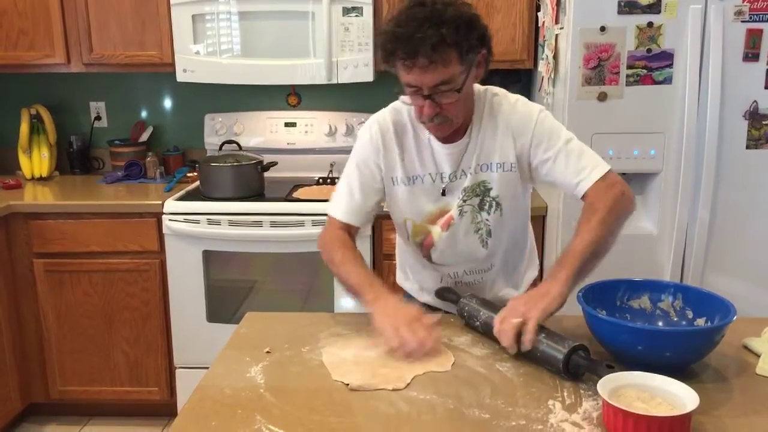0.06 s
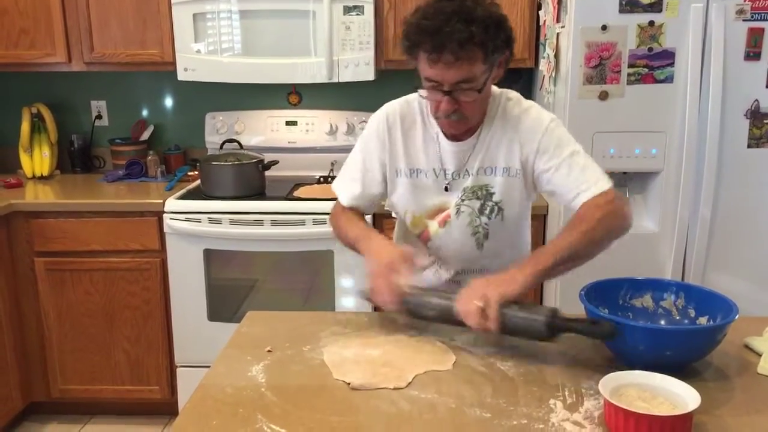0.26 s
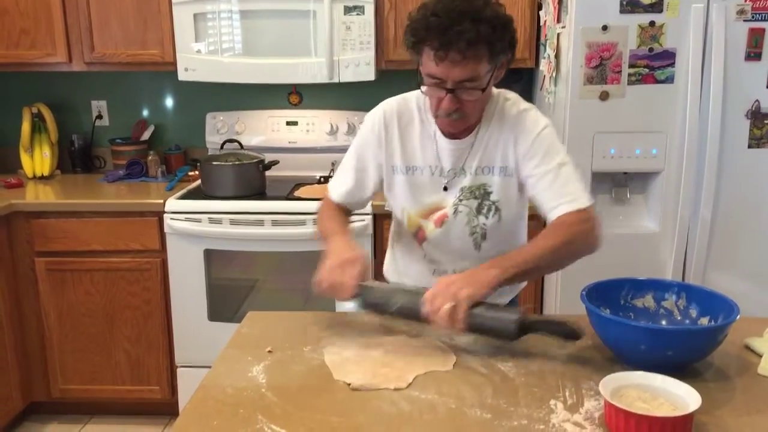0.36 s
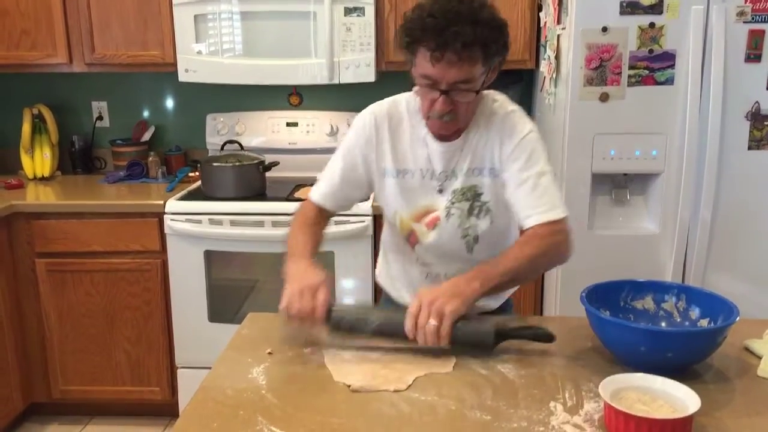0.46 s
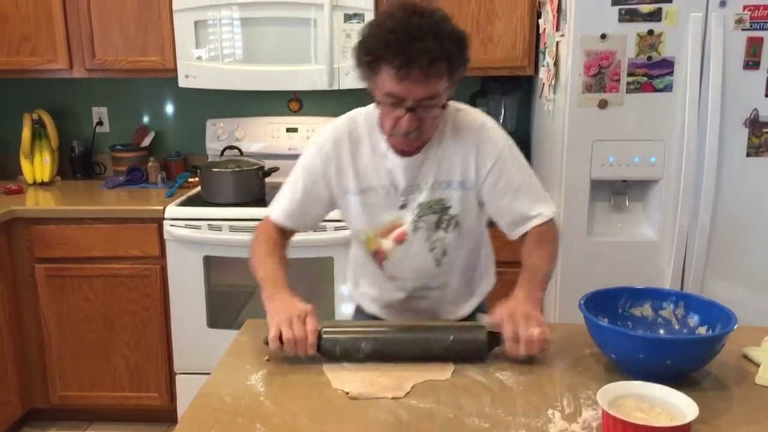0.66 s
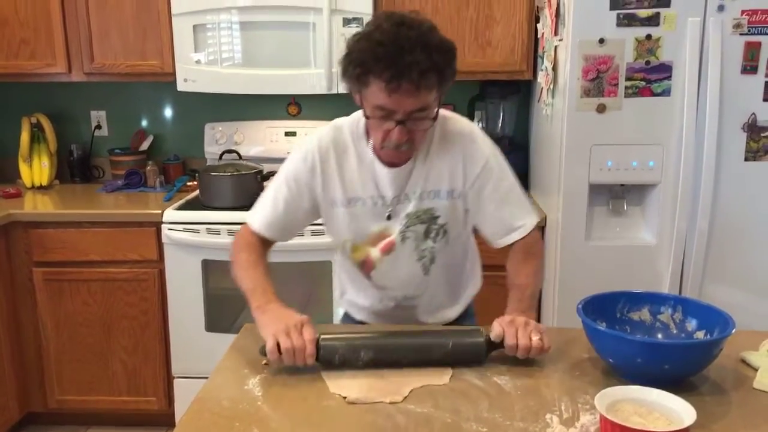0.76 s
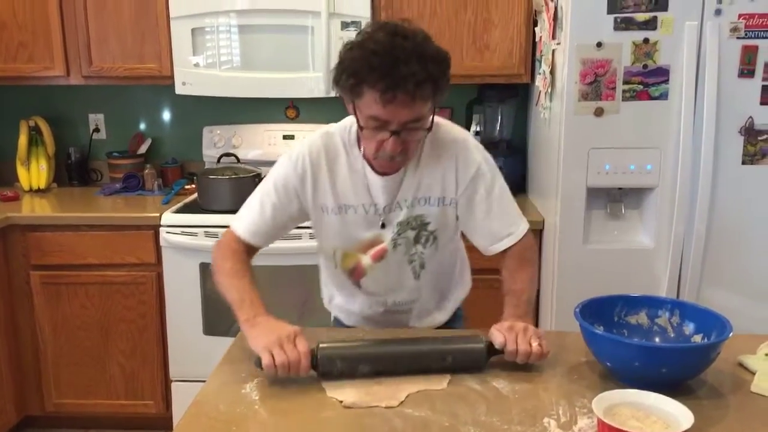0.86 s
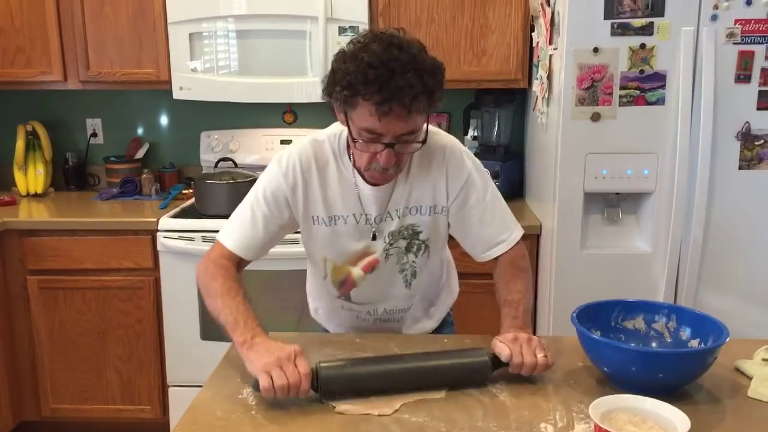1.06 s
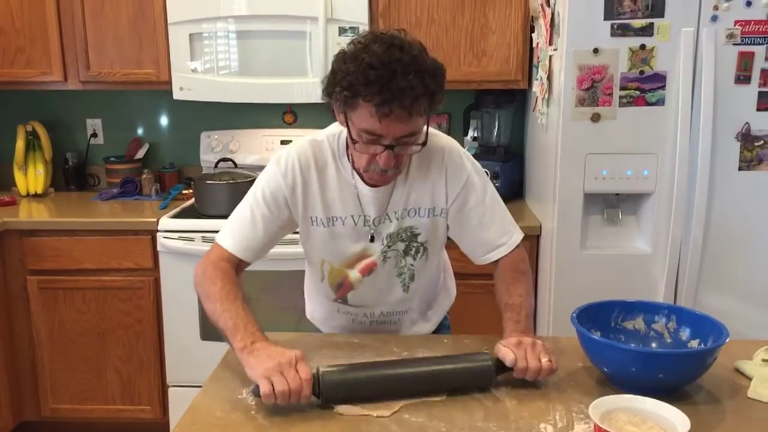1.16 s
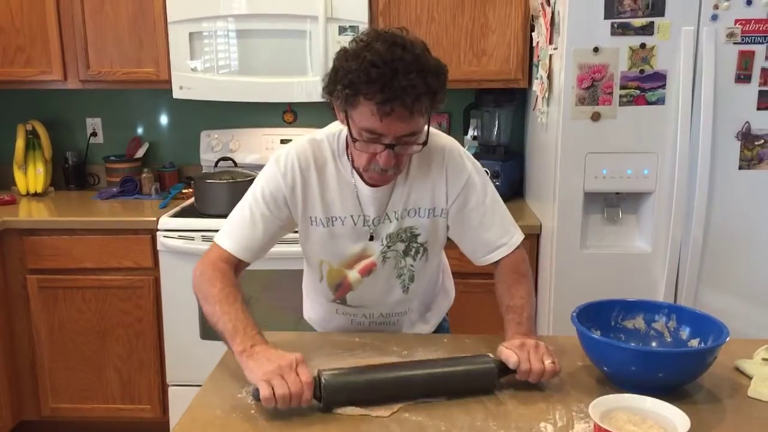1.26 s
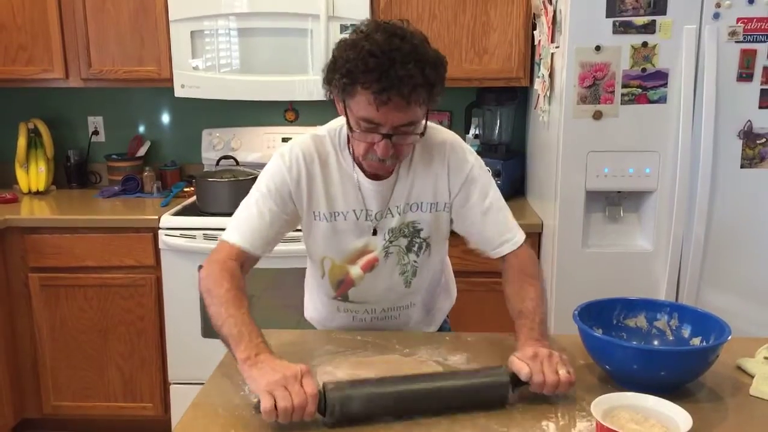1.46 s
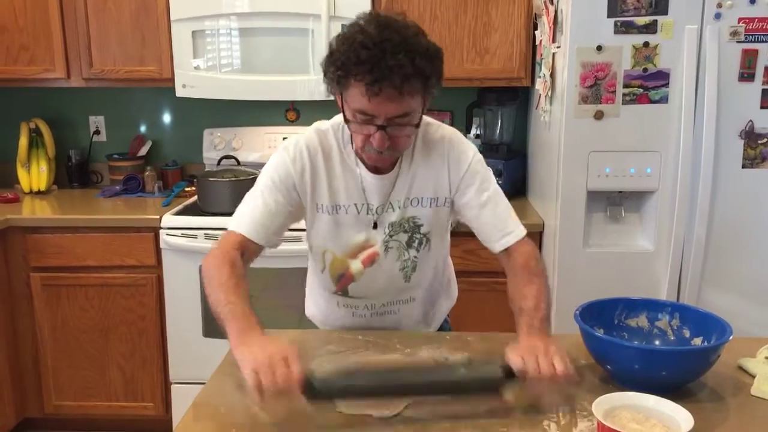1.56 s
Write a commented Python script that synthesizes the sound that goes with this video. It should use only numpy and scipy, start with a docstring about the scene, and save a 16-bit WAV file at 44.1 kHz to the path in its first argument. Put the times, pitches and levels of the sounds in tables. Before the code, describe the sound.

Rolling pin on dough: soft scrape and clack, a bright hard clack with hollow ringing, a dull landing thud with brief rumble and floury hiss, one tick, then very quiet rolling, heard fairly close in a lively kitchen.

```python
"""Rolling pin on dough

A heavy rolling pin is picked up in a kitchen: clacks of noise and beating damped sines are its barrel
hitting the handles and ringing. Damped knocks with low noise are handle knocks in the air, then thuds onto
dough on the countertop. Rolling is a low noise rumble, a grainy hiss of flour with crumb impulses, resonant
axle rub with faint sine squeaks, a lingering countertop tone near 600 Hz and a few handle ticks.
A refrigerator hums as a wavering sine in the small, live room."""
import sys
import numpy as np
from scipy import signal
from scipy.fft import rfft, irfft, next_fast_len
from scipy.io import wavfile

SR = 44100
rng = np.random.default_rng(int(sys.argv[2]) if len(sys.argv) > 2 else 0)


def bounce(signal):
    """Save signal as a 16-bit WAV file at the path given by the first command-line argument."""
    frames = np.transpose(np.atleast_2d(signal))
    limited = np.clip(frames, -1, 1)
    pcm = np.round(limited * 32767).astype(np.int16)
    wavfile.write(sys.argv[1], SR, pcm)


N = 70560

# Spectrum of still air. Each row: frequency in Hz, level in dB.
AIR_COLOUR = [(20, -5), (60, 5.5), (150, -8), (300, -8), (700, -9), (1500, -14.5), (3000, -13.5),
              (8000, -21), (15000, -24)]
HUM_HZ, HUM_DB, AIR_DB = 119.3, -69.5, -72.5  # refrigerator hum

# Rumble of weight moving on the dough. Each row: time in seconds, level in dB.
RUMBLE_LEVEL = [(0, -64), (.06, -72), (.13, -87), (.2, -70), (.49, -97), (.53, -42), (.6, -50),
                (.65, -55.5), (.75, -65), (.9, -78), (1.33, -90.5), (1.39, -62.5), (1.435, -57),
                (1.49, -59.5), (1.54, -91), (1.6, -73)]
# Rumble spectrum. Each row: frequency in Hz, level in dB.
RUMBLE_COLOUR = [(30, -9), (130, -8.5), (190, -1), (245, -7.5), (340, -10.5), (520, 3), (750, -6.5),
                 (1150, -3), (2000, -30.5), (5000, -35), (15000, -57)]
# Countertop resonances. Each row: centre in Hz, width in Hz, level in dB.
COUNTERTOP_PEAKS = [(246, 16, -1.5), (510, 20, -2.5), (530, 28, -4.5)]
COUNTERTOP_DB = 1.5  # against the rumble noise
# Deep shake of the cabinet. Each row: time in seconds, level in dB.
SHAKE_LEVEL = [(.06, -71.5), (.12, -63), (.18, -76.5), (.5, -76.5), (.53, -52), (.58, -55), (.64, -61),
               (.72, -77.5)]
# Cabinet bass spectrum. Each row: frequency in Hz, level in dB.
BASS_COLOUR = [(20, -17.5), (45, 4.5), (80, -3.5), (130, 5), (200, -1.5), (400, -29)]

# Hiss of floury surfaces sliding. Each row: time in seconds, level in dB.
FLOUR_LEVEL = [(0, -57), (.045, -47.5), (.11, -63.5), (.38, -68.5), (.47, -52), (.55, -63), (.645, -48.5),
               (.67, -80), (.9, -80), (1.35, -84), (1.39, -73.5), (1.46, -78), (1.5, -66.5), (1.54, -99)]
# Flour spectrum. Each row: frequency in Hz, level in dB.
FLOUR_COLOUR = [(500, -18), (2000, 7), (4500, -5), (6000, 0), (8500, -5.5), (13000, -7), (15500, -12.5)]
# Crushed-crumb spectrum. Each row: frequency in Hz, level in dB.
CRUMB_COLOUR = [(600, -19), (2000, -3), (4000, 7.5), (7000, -8), (15000, -10.5)]
GRAIN_DB, GRAIN_KNOTS_PER_S = 1.2, 900
CRUMBS_PER_S, CRUMB_DB, CRUMB_SPREAD_DB = 130, -8, 14  # mean rate, level against the hiss, size scatter

# Rub of the axle. Each row: time in seconds, level in dB.
AXLE_LEVEL = [(0, -73), (.05, -40), (.11, -60.5), (.2, -58.5), (.7, -54.5), (.81, -61.5), (.93, -66.5),
              (1.03, -64), (1.12, -73.5), (1.24, -84.5), (1.33, -78), (1.42, -85)]
# Axle resonances. Each row: centre in Hz, width in Hz, level in dB.
AXLE_PEAKS = [(620, 15, -7.5), (900, 260, -5), (1396, 89, 5), (1765, 140, 0.5), (2290, 120, -7),
              (2630, 280, -10)]
# Squeaks of the axle and a low lingering tone of the countertop near 600 Hz. Each row: start in
# seconds, length in seconds, pitch in Hz, glide in Hz per second, level in dB.
SQUEAKS_AND_TONE = [(.51, 0.09, 7070, 0, -58), (0.533, 0.074, 9600, 0, -59),
                    (0.513, 0.098, 12700, -2.5, -55), (0.767, 0.034, 9740, 0, -67),
                    (0.778, 0.059, 1420, -4, -61), (0.822, 0.16, 599.5, -17, -62),
                    (0.925, 0.23, 1744, -300, -63.5), (1.304, .055, 1422, -1800, -70)]
AXLE_CATCH_DB, AXLE_CATCH_KNOTS_PER_S = 3, 90
ROUGH_RAD, ROUGH_KNOTS_PER_S = 0.87, 130  # phase wander at 1 kHz, growing as the root of pitch

# Hard contacts of barrel and axle. Each row: start in seconds, level in dB, barrel ring in dB
# against that level, rod ring in dB against that level, rattle T60 in seconds.
CLACKS = [(.0075, -32, -16.5, 0, 0.036), (0.2187, -18, -3, -30, 0.062), (0.2277, -26.5, -17.5, -17, 0.028),
          (1.3841, -55.5, -18, -10, .012), (1.416, -60.5, -21, -17, 0.016),
          (1.4484, -50.5, -26.5, -11.5, 0.021)]
# Clack spectrum. Each row: frequency in Hz, level in dB.
CLACK_COLOUR = [(70, -52.5), (250, -3), (620, -2), (1000, 0.5), (1700, -3), (2900, -4), (3700, 1),
                (5500, -3.5), (7000, -8.5), (10000, -14), (15000, -20.5)]
# Barrel modes. Each row: frequency in Hz, level in dB, T60 in seconds.
BARREL_MODES = [(633, -16, 0.39), (677.2, -11.5, 0.49), (706.7, -12.5, .2), (914, -15, 0.31),
                (1026, -16.5, 0.25), (1317, -17, 0.39), (1905, -16, 0.7), (2527, -11, 0.55),
                (3620, -9, 0.26), (3780, -10.5, .13), (4664, -17, 0.18), (5570, -15.5, 0.3),
                (5784, -22, 0.38), (8880, -22.5, 0.22)]
# Thinner modes of the axle rod. Each row: frequency in Hz, level in dB, T60 in seconds.
ROD_MODES = [(1070, -16, 0.18), (1549, -14, 0.92), (3025, -6, 0.11), (3914, -12.5, .25)]
CLACK_RISE_S, CLACK_HOLD_SHARE = 0.0022, 0.12  # hold as a share of T60
BEAT_HZ, BEAT_DEPTH = 4.3, 0.85  # mean split, partner amplitude ratio
RING_WANDER_RAD, RING_FLUTTER_DB, RING_KNOTS_PER_S = 0.3, 1.5, 55

# Dull blows: handle knocks in the air, then chattering on landing and bumping while rolling.
# Each row: start in seconds, level in dB, bass in dB against that level before BASS_DB is added.
THUDS = [(.2458, -17, -29), (.2695, -26.5, -9), (0.4873, -17.5, 0.5), (0.494, -21.5, -8.5),
         (.5025, -22, -12), (.511, -24, -16), (.602, -35, -16), (1.402, -64, -18), (1.4205, -61.5, -19),
         (1.434, -63, -20)]
# Modes excited by the blows. Each row: frequency in Hz, level in dB, T60 in seconds.
THUD_MODES = [(249.4, -18, 0.14), (407, -22, 0.08), (474, -19.5, 0.11), (528, -13.5, 0.24),
              (609, -16.5, 0.1), (715, 4, 0.017), (738, -12.5, 0.09), (845, -14.5, 0.067),
              (880, -11, 0.013)]
# Blow noise spectrum. Each row: frequency in Hz, level in dB.
THUD_COLOUR = [(60, -22.5), (300, -10.5), (550, 6), (850, -3), (1200, -7), (2500, -12.5), (5000, -25),
               (9000, -42), (15000, -55.5)]
THUD_NOISE_DB, THUD_T60_S, BASS_DB, BASS_T60_S = -4.5, 0.035, -24.5, 0.42
KNOCK_LOW_CUT_HZ = 170  # the pin itself gives no deep bass

# Handles ticking on their axle. Each row: start in seconds, level in dB, brightness cutoff in Hz,
# hollow ring in dB against that level.
TICKS = [(.6432, -21.5, 4270, -16.5), (1.4815, -47.5, 3190, 4.5), (1.5675, -51, 1790, 6)]
# Tick spectrum ahead of the cutoff. Each row: frequency in Hz, level in dB.
TICK_COLOUR = [(100, -9), (500, -6), (900, 8), (2200, 12.5), (3400, 9.5), (4200, 14), (15000, -4)]
# Hollow handle modes. Each row: frequency in Hz, level in dB, T60 in seconds.
HANDLE_MODES = [(800, 7.5, 0.018), (1252, -9.5, 0.045), (1777, -8, 0.029)]
TICK_T60_S, TICK_CUT_ORDER = 0.018, 10

# Room decay. Each row: frequency in Hz, T60 in seconds.
ROOM_T60 = [(100, 0.33), (500, 0.7), (1400, 0.82), (3700, 0.59), (9000, 0.39), (15000, 0.072)]
ROOM_DELAY_S = 0.004
CLACK_ROOM_DB, RING_ROOM_DB = -6.5, -12.5
THUD_ROOM_DB, TICK_ROOM_DB, ROLL_ROOM_DB = -11, -11, -11
LOW_CUT_HZ, TOP_HZ = 38, 15500


def amp(db):
    """Amplitude ratio from dB."""
    return 10 ** (np.asarray(db) / 20)


def unit(x):
    """x scaled to rms 1."""
    return x / np.sqrt(np.mean(x ** 2) + 1e-20)


def clock():
    """Sample times in seconds."""
    return np.arange(N) / SR


def along(points, hz):
    """Interpolate (Hz, value) points on a log axis."""
    f, v = np.transpose(points)
    return np.interp(np.log(hz + 1), np.log(f + 1), v)


def level(rows):
    """Gain per sample from (s, dB) points."""
    return amp(np.interp(clock(), *np.transpose(rows)))


def filtered(x, response):
    """x times a response of frequency, zero-padded."""
    m = next_fast_len(N + SR // 2)
    return irfft(rfft(x, m) * response(np.fft.rfftfreq(m, 1 / SR)), m)[:N]


def coloured(x, colour):
    """x shaped by (Hz, dB) points, at rms 1."""
    return unit(filtered(x, lambda hz: amp(along(colour, hz))))


def noise(colour):
    """Coloured noise of rms 1."""
    return coloured(rng.standard_normal(N), colour)


def resonant(peaks):
    """Noise of rms 1 through parallel resonances of alternating sign."""
    def body(hz):
        total = 0
        for k, (centre_hz, width_hz, db) in enumerate(peaks):
            damping = 1j * hz * width_hz
            total = total + (-1) ** k * amp(db) * damping / (centre_hz ** 2 - hz ** 2 + damping)
        return total
    return unit(filtered(rng.standard_normal(N), body))


def wobble(knots_per_s):
    """A smooth random curve through normally distributed knots."""
    count = int(knots_per_s * N / SR) + 1
    return signal.resample(rng.standard_normal(count), N)


def highpass(x, order, hz):
    """Butterworth low cut."""
    return signal.sosfilt(signal.butter(order, hz, "high", fs=SR, output="sos"), x)


def fade(t60_s, hold_s=0):
    """Hold, then an exponential decay."""
    return amp(-60 * np.maximum(clock() - hold_s, 0) / t60_s)


def ring(modes, beat=0):
    """Damped sines, restless in phase and level; a close partner of amplitude beat makes each beat."""
    out = np.zeros(N)
    for hz, db, t60_s in modes:
        wander = RING_WANDER_RAD * wobble(RING_KNOTS_PER_S)
        phase = 2 * np.pi * hz * clock() + wander - wander[0]
        split = 2 * np.pi * BEAT_HZ * rng.normal(1, 0.05) * clock()
        tone = np.sin(phase) + beat * np.sin(phase + split)
        out += amp(db + RING_FLUTTER_DB * wobble(RING_KNOTS_PER_S)) * fade(t60_s) * tone
    return out


def at(start_s, x, rise_s):
    """x begins at start_s with a short exponential rise."""
    risen = x * (1 - np.exp(-clock() / rise_s))
    return np.pad(risen, (max(round(start_s * SR), 0), 0))[:N]


def background():
    """Refrigerator hum, a sine wavering in phase, over the noise of still air."""
    hum = np.sin(2 * np.pi * HUM_HZ * clock() + 0.15 * wobble(17.0))
    return amp(HUM_DB) * hum + amp(AIR_DB) * noise(AIR_COLOUR)


def rolling():
    """The barrel rumbles over the dough, the cabinet shakes, flour hisses and crumbs crackle."""
    board = noise(RUMBLE_COLOUR) + amp(COUNTERTOP_DB) * resonant(COUNTERTOP_PEAKS)
    rumble = level(RUMBLE_LEVEL) * unit(board * amp(2.2 * wobble(55)))  # uneven rumble
    shake = level(SHAKE_LEVEL) * noise(BASS_COLOUR)
    hiss = noise(FLOUR_COLOUR) * amp(GRAIN_DB * wobble(GRAIN_KNOTS_PER_S))
    struck = rng.random(N) < CRUMBS_PER_S / SR
    crumbs = struck * amp(CRUMB_SPREAD_DB * rng.standard_normal(N))
    crackle = coloured(crumbs, CRUMB_COLOUR)
    return rumble + shake + level(FLOUR_LEVEL) * unit(hiss + amp(CRUMB_DB) * crackle)


def axle_rub():
    """Uneven friction noise of the axle in narrow resonances."""
    rub = resonant(AXLE_PEAKS) * amp(AXLE_CATCH_DB * wobble(AXLE_CATCH_KNOTS_PER_S))
    return level(AXLE_LEVEL) * unit(rub)


def squeaks_and_tone():
    """Axle squeaks and the lingering countertop tone: sines, some gliding, roughened in phase."""
    out = np.zeros(N)
    for start_s, length_s, hz, glide_hz_per_s, db in SQUEAKS_AND_TONE:
        t = np.clip(clock() - start_s, 0, length_s)
        rough = ROUGH_RAD * np.sqrt(hz / 1000) * wobble(ROUGH_KNOTS_PER_S)
        phase = 2 * np.pi * (hz + glide_hz_per_s * t / 2) * t + rough
        out += amp(db) * np.sin(np.pi * t / length_s) * np.sin(phase)
    return out


def clacks():
    """The barrel chatters against its axle: noise bursts, briefly held, then decaying."""
    out = np.zeros(N)
    for start_s, db, _, _, t60_s in CLACKS:
        rattle = noise(CLACK_COLOUR) * fade(t60_s, CLACK_HOLD_SHARE * t60_s)
        out += amp(db) * at(start_s, rattle, CLACK_RISE_S)
    return out


def ringing():
    """After each hard contact the barrel rings on, slowly beating, and so does the axle rod."""
    out = np.zeros(N)
    for start_s, db, barrel_db, rod_db, _ in CLACKS:
        tone = amp(barrel_db) * ring(BARREL_MODES, BEAT_DEPTH) + amp(rod_db) * ring(ROD_MODES)
        out += amp(db) * at(start_s, tone, CLACK_RISE_S)
    return out


def thuds():
    """Dull knocks of damped modes and noise, each with its share of decaying bass noise."""
    knocks, bass = np.zeros(N), np.zeros(N)
    for start_s, db, bass_db in THUDS:
        knock = ring(THUD_MODES) + amp(THUD_NOISE_DB) * noise(THUD_COLOUR) * fade(THUD_T60_S)
        knocks += amp(db) * at(start_s, knock, rise_s=0.00075)
        bass += amp(db + BASS_DB + bass_db) * at(start_s, fade(BASS_T60_S), rise_s=0.002)
    return highpass(knocks, 2, KNOCK_LOW_CUT_HZ) + bass * noise(BASS_COLOUR)


def ticks():
    """Play in the handles: noise snaps, duller for softer contacts, with a hollow ring."""
    out = np.zeros(N)
    for start_s, db, cut_hz, ring_db in TICKS:
        steep = signal.butter(TICK_CUT_ORDER, cut_hz, fs=SR, output="sos")
        snap = signal.sosfilt(steep, noise(TICK_COLOUR) * fade(TICK_T60_S))
        snap *= np.sqrt(TOP_HZ / cut_hz) / 2  # more gain for a narrower band
        out += amp(db) * at(start_s, snap + amp(ring_db) * ring(HANDLE_MODES), rise_s=0.001)
    return out


def kitchen(x):
    """The room's answer: a noise tail, each frequency dying at its own speed."""
    hz, t, z = signal.stft(rng.standard_normal(SR), SR, nperseg=256)
    decay = amp(-60 * t / along(ROOM_T60, hz)[:, None])
    tail = signal.istft(z * decay, SR, nperseg=256)[1]
    wet = signal.fftconvolve(x, tail / np.linalg.norm(tail))[:N]
    return at(ROOM_DELAY_S, wet, rise_s=0.00073)


def scene():
    """Each source with its own amount of room, over the dry background."""
    sources = [(rolling() + axle_rub() + squeaks_and_tone(), ROLL_ROOM_DB), (clacks(), CLACK_ROOM_DB),
               (ringing(), RING_ROOM_DB), (thuds(), THUD_ROOM_DB), (ticks(), TICK_ROOM_DB)]
    mix = background()
    for x, room_db in sources:
        mix = mix + x + amp(room_db) * kitchen(x)
    return mix[None]


def record(dry):
    """The microphone loses the deepest bass and keeps nothing above its band limit."""
    x = highpass(dry[0], 4, LOW_CUT_HZ)
    return filtered(x, lambda hz: hz < TOP_HZ)[None]


dry = scene()
out = record(dry)
bounce(out)
```